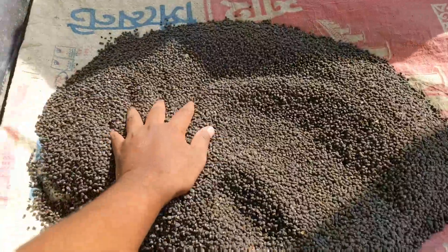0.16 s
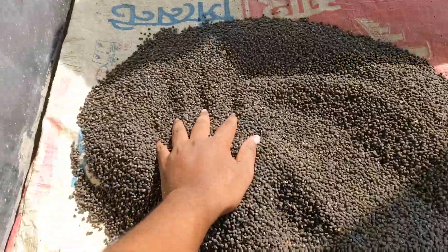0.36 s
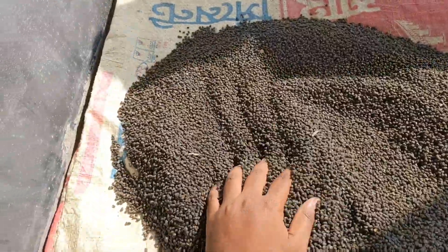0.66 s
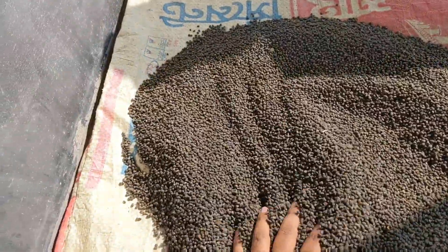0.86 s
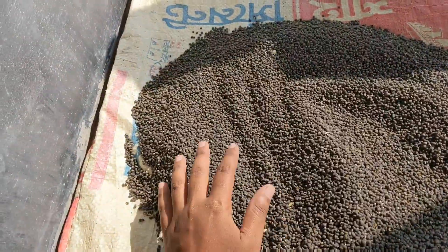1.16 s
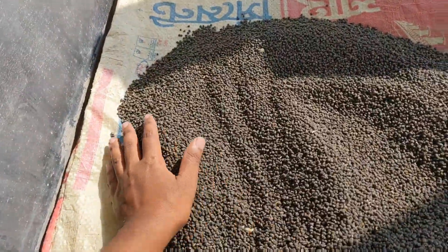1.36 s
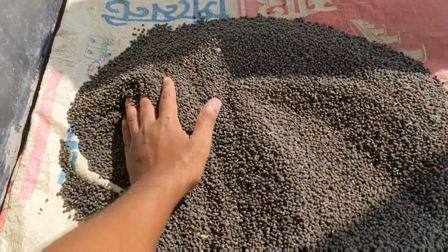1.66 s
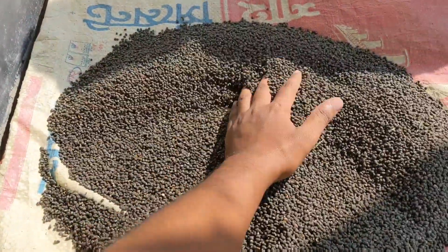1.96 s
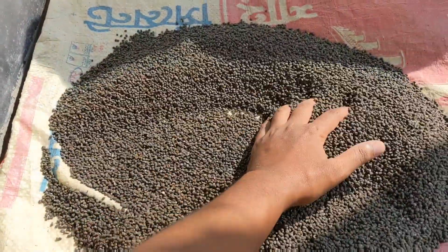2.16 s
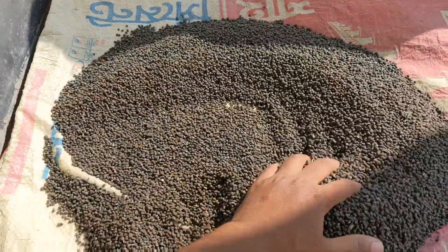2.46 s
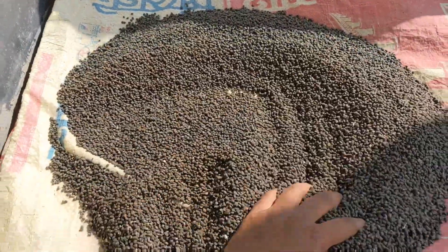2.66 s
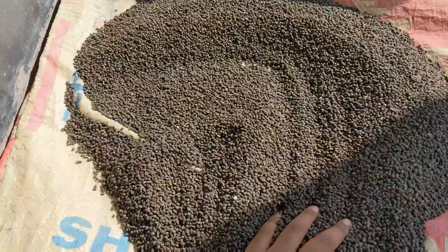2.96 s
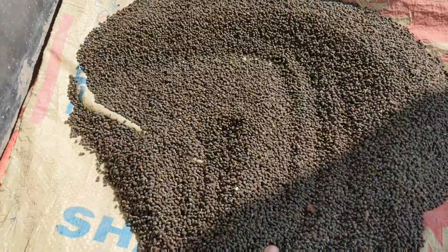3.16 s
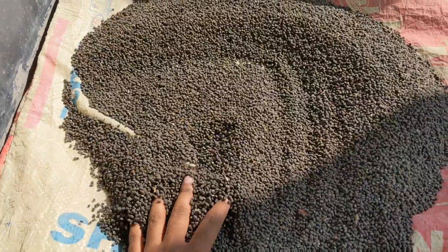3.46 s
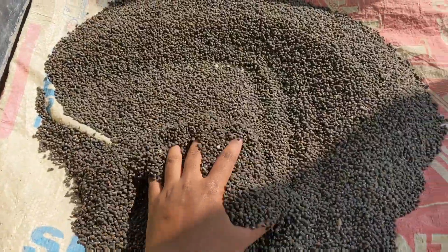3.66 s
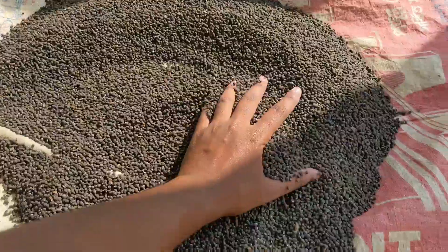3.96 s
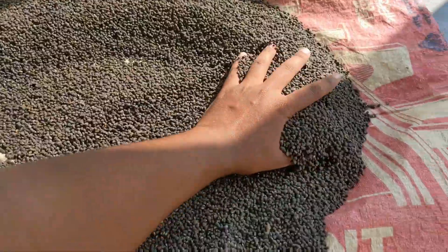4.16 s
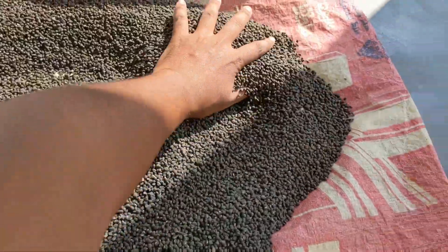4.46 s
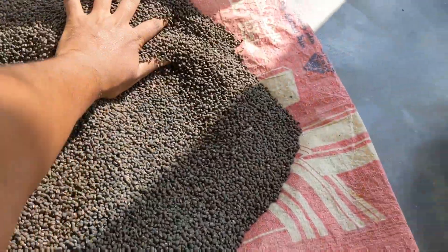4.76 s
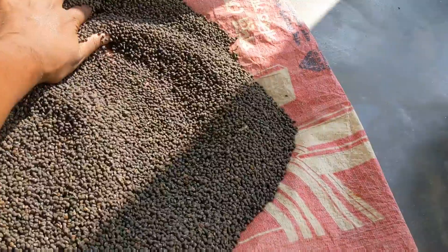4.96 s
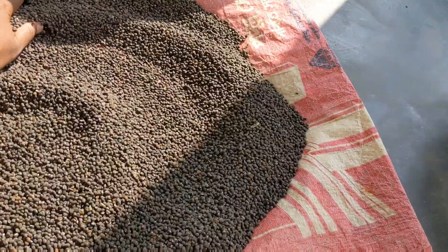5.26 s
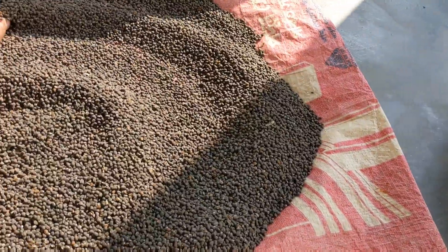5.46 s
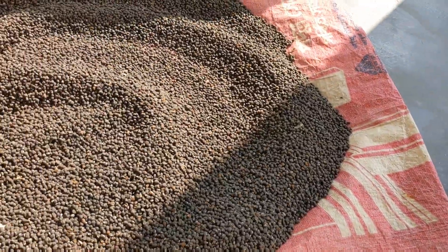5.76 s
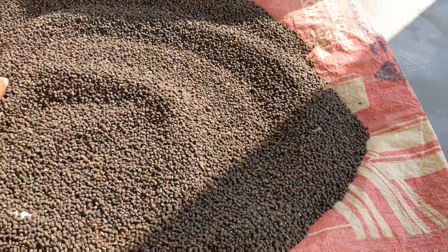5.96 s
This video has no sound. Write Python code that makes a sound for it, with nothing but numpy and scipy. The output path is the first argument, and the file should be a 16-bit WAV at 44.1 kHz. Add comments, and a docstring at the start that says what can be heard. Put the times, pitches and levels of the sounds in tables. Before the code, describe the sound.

Thousands of small hard dry seeds rattle brightly very close to a stereo microphone as a hand rakes a pile on a woven plastic sack. Strokes swell and ease, with raspy sliding and lower crunching, quieter gaps near 1.3 and 4.2 seconds, then the strongest surge at 4.5. A few dull knocks come at the end, over faint low outdoor rumble and small wind thumps.

```python
"""Small dry seeds rattle close to the microphone as a hand sweeps through a pile on a woven plastic sack.
The rattle is thousands of random clicks, coloured bright; darker clicks make the rasp over the weave,
and the crunch and drag where the fingers press. Clumps give way in short bursts of noise.
A scratch of filtered noise and a few dull knocks, fading tones, stand out.
Puffs of air, short bursts of deep noise, buffet the microphone over a low, steady outdoor rumble."""
import sys
import numpy as np
from scipy import signal
from scipy.fft import rfft, irfft
from scipy.io import wavfile

SR = 44100
rng = np.random.default_rng(int(sys.argv[2]) if len(sys.argv) > 2 else 0)


def dump(signal):
    """Clip the signal to [-1, 1] and save it as 16-bit WAV at the path in sys.argv[1]."""
    limited = np.clip(np.atleast_2d(signal).T, -1, 1)
    pcm = np.round(limited * 32767).astype(np.int16)
    wavfile.write(sys.argv[1], SR, pcm)


N = 269010
TIME = np.arange(N) / SR
FRAMES = dict(fs=SR, nperseg=1024, noverlap=768)  # short overlapping slices, to change the colour over time
BIN_HZ, FRAME_S = signal.stft(TIME, **FRAMES)[:2]


def amp(db):
    """Turns decibels into gain."""
    return 10 ** (np.asarray(db) / 20)


def evened(pair):
    """Scales a stereo pair so that the mean of its two sides has rms 1."""
    return pair / np.sqrt(np.mean(pair.mean(0) ** 2) + 1e-20)


def over_hz(table, hz=BIN_HZ):
    """Reads the columns of a table along log frequency, each of shape (bins, 1)."""
    table_hz, *columns = np.transpose(table)
    return [np.interp(np.log(hz + 1), np.log(table_hz + 1), column)[:, None] for column in columns]


def over_time(table, times):
    """Reads the columns of a table at the given times."""
    table_s, *columns = np.transpose(table)
    return [np.interp(times, table_s, column) for column in columns]


def shifted(spectrum, octaves):
    """Moves a spectrum up or down frame by frame; the result has shape (bins, frames)."""
    table_hz, db = np.transpose(spectrum)
    return np.interp(np.log2(BIN_HZ[:, None] + 1) - octaves, np.log2(table_hz + 1), db)


def add(mix, start_s, sound):
    """Mixes a sound into the stereo mix at its start time."""
    part = mix[:, max(round(start_s * SR), 0):][:, :sound.shape[1]]
    part += sound[:, :part.shape[1]]


def panned(left_over_right_db):
    """Gives left and right gains for a level difference."""
    return amp([[left_over_right_db / 2], [-left_over_right_db / 2]])


def band(x, centre_hz, octaves):
    """Keeps a bell-shaped band of pitches on a log-frequency axis."""
    hz = np.fft.rfftfreq(x.shape[-1], 1 / SR) + 1
    bell = np.exp(-.5 * (np.log2(hz / centre_hz) / octaves) ** 2)
    return irfft(rfft(x) * bell, x.shape[-1])


# How the two microphone ports hear the seeds.
# Columns: pitch_hz, likeness (0-1), right_lead_rad (phase at full delay), left_over_right_db
PORT_DIFFERENCES = [(100, 1, 0, 2.5), (330, 0.97, 0.52, -2), (600, 0.89, 0.8, -0.5), (875, .75, 0.9, -2),
                    (1200, 0.9, 1.6, 2.5), (1550, .55, 4, -0.5), (2010, 0.1, 4.5, 2), (2460, 0.26, 6, 2),
                    (3240, 0.33, 10, 3.5), (4180, 0.1, 14, 1.5), (6430, 0.03, 18.5, 3.5),
                    (9600, 0, 19, 2.3), (11700, 0, 19, -1.5), (13200, 0, 17.5, -12.5)]


def at_ports(pair, colour_db, lean_db=0, delay=1):
    """Colours two unrelated signals and blends them for the ports: alike in the bass, apart in the treble."""
    a, b = signal.stft(pair, **FRAMES)[2]
    alike, lead_rad, balance_db = over_hz(PORT_DIFFERENCES)
    alike = np.clip(alike, 0, 1)
    phase = lead_rad * delay
    ratio = amp(balance_db + lean_db)
    left = ratio * a
    right = (alike * a + np.sqrt(1 - alike ** 2) * b) * np.exp(1j * phase)
    # dividing by the expected size of the sum keeps the colour of the two ports together
    together = np.sqrt(1 + ratio ** 2 + 2 * ratio * alike * np.cos(phase))
    slices = np.array([left, right]) * amp(colour_db) / together
    return evened(signal.istft(slices, **FRAMES)[1][:, :N])


# Colour of the outdoor background. Columns: pitch_hz, density_db (per Hz)
RUMBLE_COLOUR = [(25, -40), (42, -20), (58, -5), (80, -7.5), (105, -7), (140, 2), (170, -1), (198, -.5),
                 (230, -10.5), (320, -15), (700, -26), (3000, -35)]


def outdoors(level_db=-53, own=0.33):
    """A steady, distant rumble: deep noise, nearly the same at both ports."""
    air = rng.standard_normal(N) + own * rng.standard_normal((2, N))
    colour_db = over_hz(RUMBLE_COLOUR, np.fft.rfftfreq(N, 1 / SR))[0].T
    return amp(level_db) * evened(irfft(rfft(air) * amp(colour_db), N))


# Puffs of air on the microphone.
# Columns: middle_s, level_db, length_s, centre_hz, left_over_right_db
AIR_PUFFS = [(1.198, -35, .04, 74, 4), (1.237, -27.5, .045, 84, 10), (1.32, -50, .2, 100, 0),
             (1.525, -37, 0.063, 114, 2), (1.6, -46.5, 0.099, 110, 5), (1.667, -45.5, 0.054, 122, -9),
             (4.07, -46, .15, 85, 7), (4.19, -43.5, .2, 66, 4)]


def puffs(octaves=0.5, shared=.6):
    """Eddies push on the ports, partly on both and partly on each alone."""
    out = np.zeros((2, N))
    for middle_s, level_db, length_s, centre_hz, pan_db in AIR_PUFFS:
        eddies = band(rng.standard_normal((3, SR // 2)), centre_hz, octaves)[:, :int(length_s * SR)]
        push = shared * eddies[2] + eddies[:2]
        push = push * signal.windows.tukey(eddies.shape[1], .6)
        push = push / push.std(1, keepdims=True)
        add(out, middle_s - length_s / 2, amp(level_db) * panned(pan_db) * push)
    return out


# Dull knocks on the sack.
# Columns: start_s, peak_db (of the outline), pitch_hz, t60_s (time to fade by 60 dB)
SACK_KNOCKS = [(6.008, -26.5, 436, 0.026), (6.0493, -25, 450, 0.021), (6.0975, -26.5, 680, .015)]


def knocks(rise_s=.0007):
    """The sack rings for a few cycles, damped by the seeds that lie on it."""
    out, t = np.zeros((2, N)), TIME[:SR // 10]
    for start_s, peak_db, pitch_hz, t60_s in SACK_KNOCKS:
        outline = (1 - np.exp(-t / rise_s)) ** 2 * np.exp(-np.log(1000) * t / t60_s)
        ring = outline / outline.max() * np.sin(2 * np.pi * pitch_hz * t)
        add(out, start_s, amp(peak_db) * ring[None])
    return out


# A short, dry scratch close to the left port. Columns: start_s, level_db, length_s, left_over_right_db
DRY_SCRATCH = (4.174, -30.5, .012, 12)
# Its colour. Columns: pitch_hz, density_db (per Hz)
SCRATCH_SPECTRUM = [(400, -15), (1900, -15), (2300, 0), (2680, 0), (3100, -11), (3700, -8), (5000, -19),
                    (9000, -32)]


def scratch():
    """One quick slip: a few milliseconds of rubbing, made of coloured noise."""
    start_s, level_db, length_s, pan_db = DRY_SCRATCH
    out, hz = np.zeros((2, N)), np.fft.rfftfreq(SR, 1 / SR)
    colour_db = over_hz(SCRATCH_SPECTRUM, hz)[0].T
    rub = irfft(rfft(rng.standard_normal(SR)) * amp(colour_db))[:, :int(length_s * SR)]
    rub = rub * signal.windows.tukey(rub.shape[1], .5)
    add(out, start_s, amp(level_db) * evened(panned(pan_db) * rub))
    return out


# Clumps of seeds that give way at once.
# Columns: start_s, level_db (before the outline), centre_hz, width_octaves, decay_s (to fade by 60 dB)
SEED_CLUMPS = [(.763, -33, 13500, 0.44, 0.033), (1.476, -37, 950, .42, .28), (1.606, -37, 6000, 1, .02),
               (1.653, -34.5, 6500, 1, 0.026), (2.629, -32, 804, 0.47, .035), (2.681, -29, 1000, .8, .04),
               (3.4615, -31, 12000, 0.81, .15), (3.921, -35, 1600, .6, .02), (4.195, -41, 650, 0.38, 0.065),
               (4.57, -29, 1300, 1, 0.068), (5.028, -33, 1310, .8, 0.068), (6.05, -27, 1700, .8, .03)]


def clumps(rise_share=.04):
    """A clump gives way in a burst of noise that dies quickly; slower-fading ones also start slower."""
    out, t = np.zeros((2, N)), TIME[:SR // 3]
    for start_s, level_db, centre_hz, octaves, decay_s in SEED_CLUMPS:
        ticks = rng.standard_normal((2, len(t)))
        alike = np.clip(over_hz(PORT_DIFFERENCES, np.array([centre_hz]))[0].item(), 0, 1)
        ticks[1] = alike * ticks[0] + np.sqrt(1 - alike ** 2) * ticks[1]
        outline = (1 - np.exp(-t / (rise_share * decay_s))) * np.exp(-np.log(1000) * t / decay_s)
        burst = evened(band(ticks, centre_hz, octaves)) * outline / np.sqrt(outline.max())
        add(out, start_s, amp(level_db) * burst)
    return out


def patches(width_hz, length_s):
    """Random, smoothly drifting unevenness of the colour over pitch and time."""
    field = rng.standard_normal((len(BIN_HZ), len(FRAME_S)))
    steps = np.arange(-60, 61)
    for axis, span in enumerate([width_hz / BIN_HZ[1], length_s / FRAME_S[1]]):
        bell = np.exp(-(2 * steps / span) ** 2)
        field = signal.fftconvolve(field, np.expand_dims(bell, 1 - axis), "same")
    return field / field.std()


def collisions(level_db, per_s, spread_db, surge_db, surge_hz):
    """Clicks of uneven size: more of them when more seeds move, bunched into tiny avalanches."""
    # per_s is the rate at the median level
    chance = np.clip(per_s / SR * amp(level_db - np.median(level_db)), 1e-4, 1)
    hits = (rng.random((2, N)) < chance) / np.sqrt(chance)  # the root keeps the power even
    spread = np.clip(rng.standard_normal((2, N)), -3, 3)
    sizes = rng.choice([-1, 1], (2, N)) * amp(spread_db * spread)
    hz = np.fft.rfftfreq(N, 1 / SR)
    surge_shape = hz / (hz + 5) / (1 + (hz / surge_hz) ** 2)
    surges = irfft(rfft(rng.standard_normal(N)) * surge_shape, N)
    return hits * sizes * amp(surge_db * surges / surges.std())


# Loose seeds set rolling by the sweep of the hand.
# Columns: time_s, level_db, brightness_db (the change at 13 kHz)
HAND_SWEEP = [(0, -34.5, -0.8), (0.08, -34.1, -0.6), (0.49, -41.6, 0.9), (0.75, -35.7, 0.5),
              (1.03, -34.7, -0.4), (1.26, -45.8, 0.3), (1.47, -43.9, -1.6), (2.04, -34.9, 1.7),
              (2.27, -37.2, 0.3), (2.87, -33.5, -0.8), (3.33, -34.0, -0.2), (3.82, -35.7, 2.4),
              (4.26, -44.9, 3.8), (4.49, -29.5, -3.8), (4.85, -33.9, -2.0), (5.37, -39.0, 0.7),
              (5.67, -38.7, -0.1), (6.1, -32.7, -0.3)]
# Pushes of the fingers into the pile. Columns: start_s, rise_s, hold_s, crunch_db,
# rasp_over_crunch_db, drag_over_crunch_db, pitch_shift_octaves (weighted by the push's share of the power)
FINGER_PUSHES = [(-0.09, 0.12, 0.18, -39.6, 3.3, -3.8, -0.09), (0.76, 0.32, 0.03, -43.9, 3.9, -11.3, 0.16),
                 (1.03, 0.08, 0.35, -49.7, -5.5, -4.0, -0.07), (1.46, 0.02, 0.2, -45, -1, -2.3, -0.01),
                 (2.08, 0.1, 0.28, -42.8, -11, -7, -0.12), (2.56, 0.22, 0.23, -33.7, -1.6, -12.8, -0.01),
                 (3.05, 0.19, 0.07, -39.2, 3.3, -16.0, 0.06), (3.41, 0.14, 0.01, -49, -0.4, 1, 0.03),
                 (3.63, 0.11, 0.21, -44.0, -0.8, -20.3, 0.61), (4.25, 0.32, 0.14, -34.3, -5.6, -10.8, 0.03),
                 (4.49, 0.1, 0.45, -40.9, 2.7, -1.2, -0.15), (5.69, 0.2, 0.03, -50.2, 3.3, -2.5, -0.04)]
# Rows: rasp, crunch, drag
SKIM_DB = np.array([[-9.6], [-16.3], [-20.9]])  # stirred up by the sweep alone, relative to the loose seeds
FADE_DB_PER_S = np.array([[55], [51], [42]])  # after a push the seeds settle, the deep pile last
SAG_DB_PER_S = 2.7  # a push eases a little while it is held


def friction():
    """Levels of rasp, crunch and drag, and pitch shift: some follows the sweep; pushes build, hold and fade."""
    power = amp(over_time(HAND_SWEEP, TIME)[0] + SKIM_DB) ** 2
    shift = 0
    for start_s, rise_s, hold_s, crunch_db, rasp_db, drag_db, octaves in FINGER_PUSHES:
        build = np.clip((TIME - start_s) / rise_s, 0, 1) ** 1.3
        since_top = TIME - start_s - rise_s
        sag_db = SAG_DB_PER_S * np.clip(since_top, 0, hold_s)
        ease_db = sag_db + FADE_DB_PER_S * np.maximum(since_top - hold_s, 0)
        push = (amp([[rasp_db], [0], [drag_db]]) * build * amp(crunch_db - ease_db)) ** 2
        power = power + push
        shift = shift + octaves * push.sum(0)
    rasp_db, crunch_db, drag_db = 10 * np.log10(power)
    return rasp_db, crunch_db, drag_db, np.interp(FRAME_S, TIME, shift / power.sum(0))


# Where the hand works. Columns: time_s, left_lean_db,
# reach (0-1: far out, the sound meets the right port first)
HAND_PLACE = [(0, 0.5, 1), (.4, 2, 1), (.95, 0, 0.83), (1.35, 3, 0.4), (1.8, 0, 1), (2.55, 4, 0.7),
              (2.68, 0, 0.3), (3.3, 2, 0.2), (3.6, -1, .15), (3.85, -1.5, 0.95), (4.5, -3.5, 0.7),
              (4.8, -1, 1), (5.7, -0.5, 1)]
# Colour of the rasp. Columns: pitch_hz, density_db (per Hz)
RASP_COLOUR = [(700, -32), (1400, -8), (1800, 0), (2150, .3), (2600, .7), (2900, -2.5), (3300, -10),
               (6000, -26)]


def sliding_seeds(level_db, octaves):
    """Seeds pushed along the sack rasp over its weave: clicks of middle pitch."""
    clicks = collisions(level_db, per_s=5500, spread_db=3.5, surge_db=0.63, surge_hz=50)
    uneven_db = 2 * patches(width_hz=165, length_s=0.086)
    lean_db = .6 * over_time(HAND_PLACE, FRAME_S)[0]
    return amp(level_db) * at_ports(clicks, shifted(RASP_COLOUR, octaves) + uneven_db, lean_db)


# Colours of the crunch and of the dragged pile. Columns of both: pitch_hz, density_db (per Hz)
CRUNCH_COLOUR = [(300, -32), (620, -14), (820, -3.5), (1000, -2), (1300, 0.5), (1600, -1.5), (1950, -6),
                 (3500, -35)]
DRAG_COLOUR = [(120, -19), (250, -11), (340, -3), (420, -2.5), (520, -3.5), (660, 4), (790, -2.5),
               (980, -12), (2000, -37)]


def pressed_seeds(crunch_db, drag_db, octaves):
    """Seeds under the fingers stick and slip: they crunch and drag the pile, deeper when the hand is near."""
    lean_db, reach = over_time(HAND_PLACE, FRAME_S)
    uneven_db = 2.1 * patches(width_hz=80, length_s=.12)
    depth_db = over_hz([(400, 6), (600, 0)])[0] * (.7 - reach)
    snaps = collisions(crunch_db, per_s=2600, spread_db=3.0, surge_db=0.1, surge_hz=45)
    crunch = at_ports(snaps, shifted(CRUNCH_COLOUR, octaves) + uneven_db, lean_db, reach)
    slips = collisions(drag_db, per_s=1400, spread_db=3.3, surge_db=1.3, surge_hz=35)
    drag = at_ports(slips, over_hz(DRAG_COLOUR)[0] + uneven_db + depth_db, 0, reach)
    return amp(crunch_db) * crunch + amp(drag_db) * drag


# Colour of the rattle. Columns: pitch_hz, density_db (per Hz)
RATTLE_COLOUR = [(500, -40), (1500, -18), (2700, -5.5), (3400, 0), (4500, 0), (5800, -2.5), (7000, -1.5),
                 (8000, -3.5), (9500, -3), (11500, -4), (13300, -7), (15600, -7)]


def loose_seeds():
    """Hard little seeds tick against each other; the brightness of the ticks follows the sweep."""
    level_db = over_time(HAND_SWEEP, TIME)[0]
    bright_db = over_time(HAND_SWEEP, FRAME_S)[1]
    tilt, = over_hz([(3500, -.4), (6000, -.3), (8500, .2), (13000, 1)])
    uneven_db = 1.1 * patches(width_hz=480, length_s=0.1)
    colour_db = over_hz(RATTLE_COLOUR)[0] + tilt * bright_db + uneven_db
    clicks = collisions(level_db, per_s=15000, spread_db=2.5, surge_db=.4, surge_hz=60)
    return amp(level_db) * at_ports(clicks, colour_db)


def scene():
    """Adds up everything heard at the two ports, from the background to the seeds."""
    rasp_db, crunch_db, drag_db, octaves = friction()
    background = outdoors() + puffs()
    accents = knocks() + scratch() + clumps()
    pressed = sliding_seeds(rasp_db, octaves) + pressed_seeds(crunch_db, drag_db, octaves)
    return background + accents + pressed + loose_seeds()


# Resonances of the ports and the case. Columns: centre_hz, width_hz, boost_db
CASE_RINGS = [(5250, 220, 2.5), (6320, 250, 2.5), (6810, 180, 2.5), (12250, 200, 2.5), (12850, 250, 3),
              (13770, 360, 8), (14650, 320, 7)]


def record(dry, low_cut_hz=36, edge_hz=15620):
    """The ports ring in the treble and lose the deepest bass; then all above the edge is cut off."""
    hz = np.fft.rfftfreq(N, 1 / SR)
    ring_db = sum(db * np.exp(-(2 * (hz - centre) / width) ** 2) for centre, width, db in CASE_RINGS)
    low_cut = hz ** 2 / np.hypot(hz ** 2, low_cut_hz ** 2)
    coloured = irfft(rfft(dry) * amp(ring_db) * low_cut, N)
    band_limit = signal.firwin(1023, edge_hz, window=("kaiser", 9), fs=SR)
    return signal.oaconvolve(coloured, band_limit[None], "same")


dry = scene()
out = record(dry)
dump(out)
```